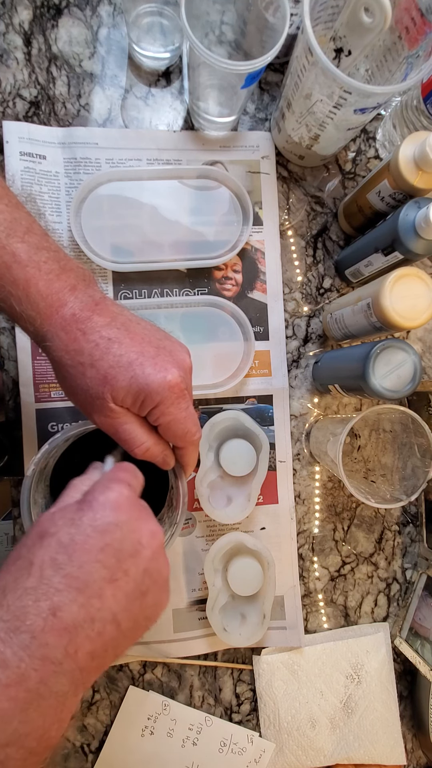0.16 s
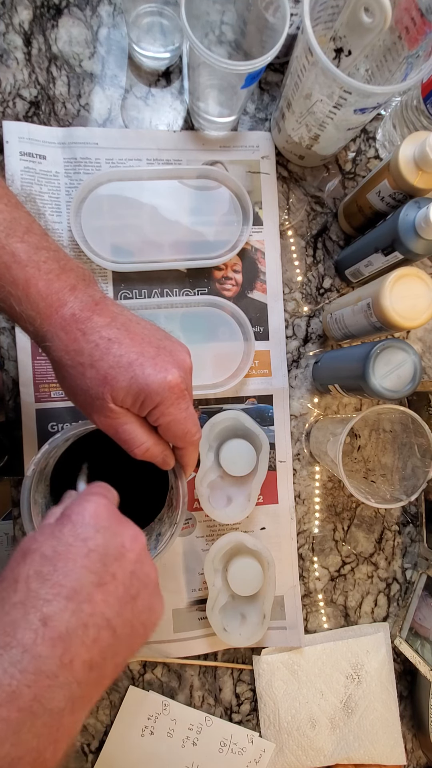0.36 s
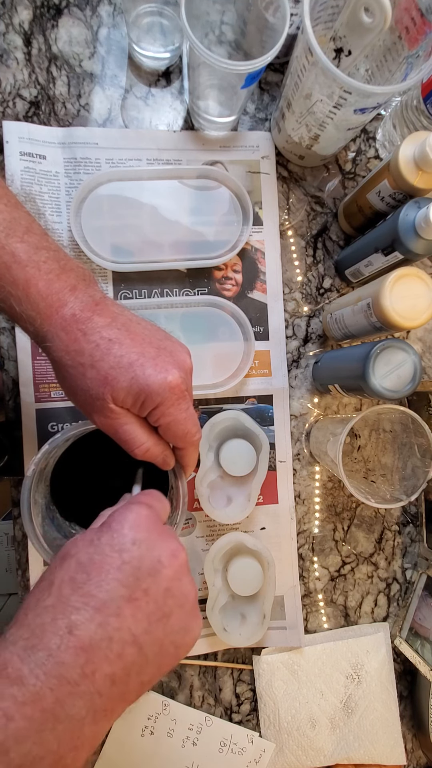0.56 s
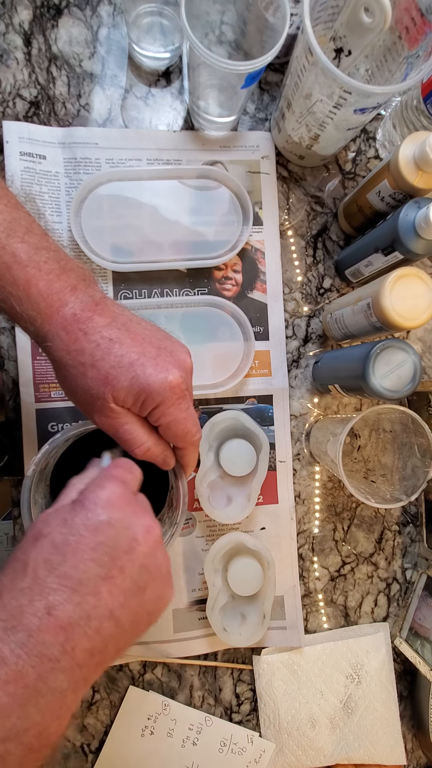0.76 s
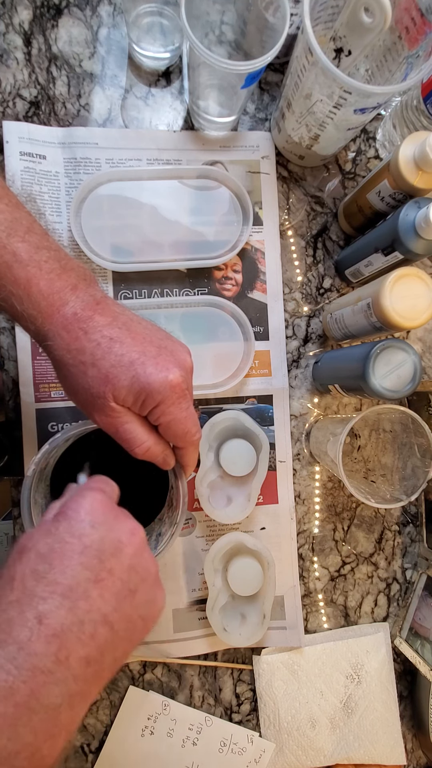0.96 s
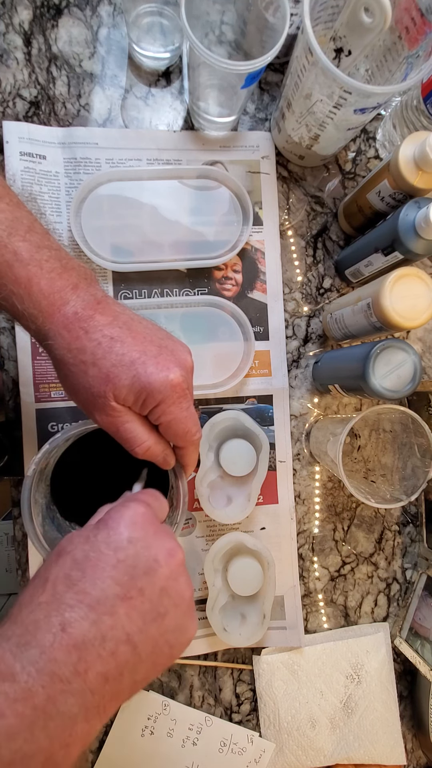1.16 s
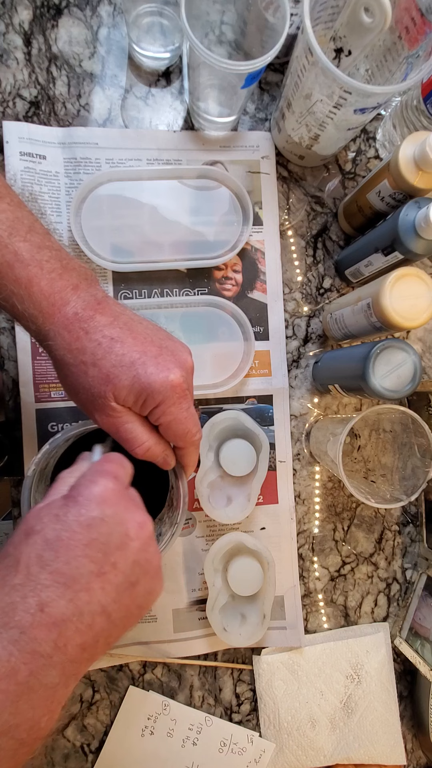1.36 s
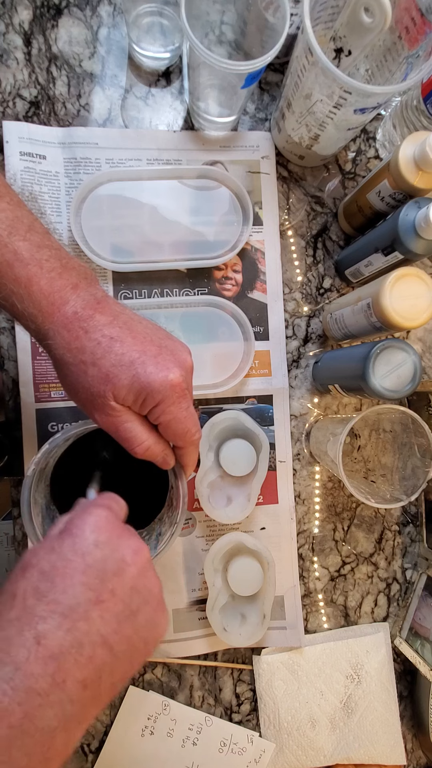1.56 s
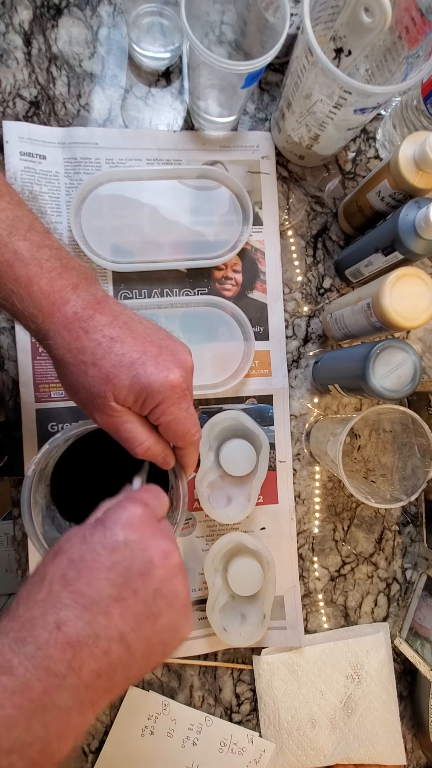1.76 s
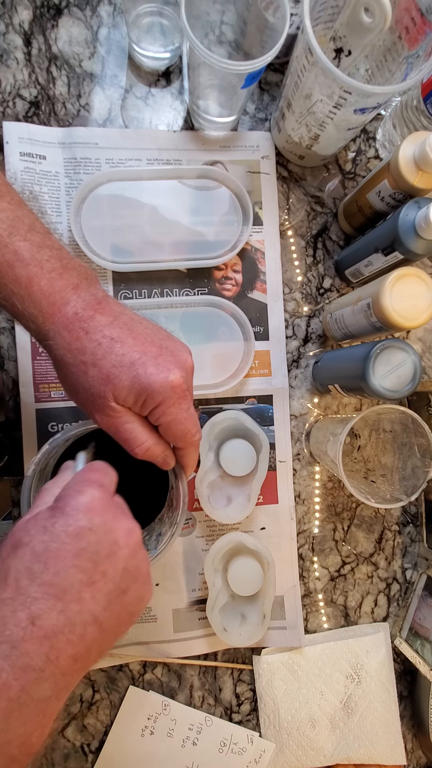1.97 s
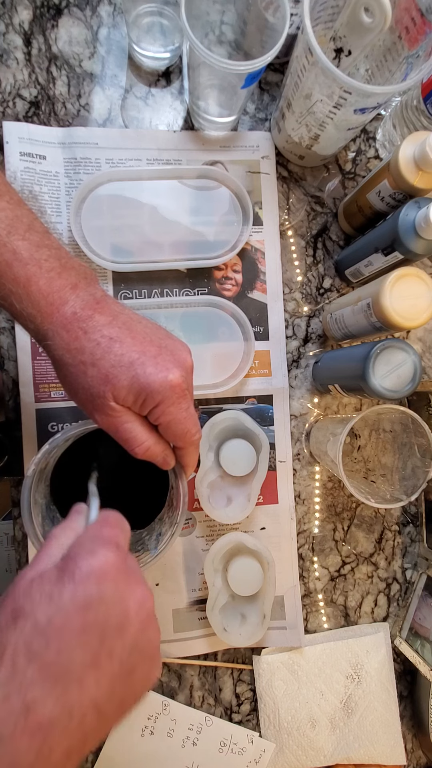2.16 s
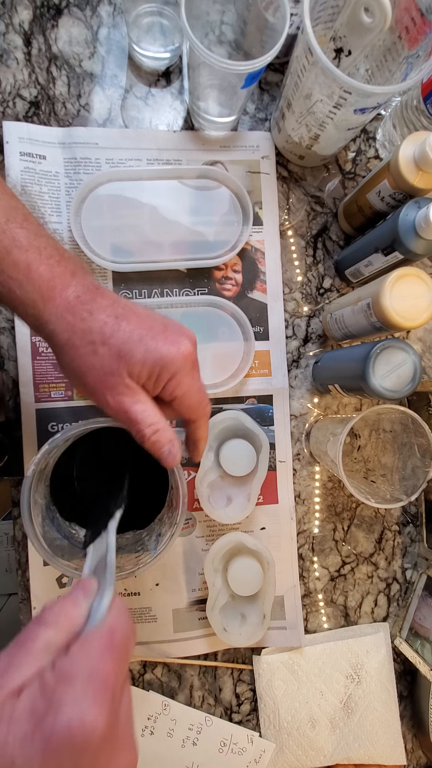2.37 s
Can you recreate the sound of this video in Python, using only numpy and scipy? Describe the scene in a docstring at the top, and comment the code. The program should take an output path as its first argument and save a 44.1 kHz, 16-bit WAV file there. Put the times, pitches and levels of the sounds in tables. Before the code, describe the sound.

A stick scrapes round a plastic cup of wet, gritty cement in quick strokes.

```python
"""A stick stirs gritty wet cement in a plastic cup on a bench, close up in a small, quiet workshop.
The scraping eases in and settles at about three strokes a second: sand grains caught under the stick
shake the cup wall, which booms and rings over the low slosh of the mix. At the turns the stick ticks
on the wall. After a little over two seconds the stirring stops, leaving one soft tick and faint air."""
import sys
import numpy as np
from scipy import signal
from scipy.fft import rfft, irfft, next_fast_len
from scipy.io import wavfile
from scipy.ndimage import uniform_filter1d, map_coordinates

SR = 44100
rng = np.random.default_rng(int(sys.argv[2]) if len(sys.argv) > 2 else 0)


def pcm_store(signal):
    """Save signal as 16-bit PCM."""
    levels = np.round(np.clip(np.atleast_2d(signal), -1, 1) * 32767)
    wavfile.write(sys.argv[1], SR, levels.astype(np.int16).T)


N = 110250

# The plastic wall's resonances. Each row: pitch in Hz, width in Hz, relative level in dB.
WALL_MODES = [(228.4, 102, -9), (361, 60, -7), (1035, 213, -8), (1528.6, 107, 2.5), (1747, 153, -2),
              (1900, 130, -2.5), (2260, 155, -5), (2758, 186, -5.5), (3260, 387, -9.5), (3935, 720, -12),
              (4920, 930, -15.5), (6390, 620, -16)]


def scrape():
    """Grit under the stick drives wall ring, boom and sandy hiss; the heavy mix follows sluggishly."""
    # The stick's pressure. Each row: time in seconds, level in dB, boom and hiss sends in dB.
    strokes = [(0.07, -65, -10, -8.5), (0.09, -59.5, 3.5, -11), (0.2, -46, 2.5, -10.5),
               (0.28, -36, -7.5, -10), (0.305, -36, 5.5, -19), (0.33, -37.5, -11, -8.5),
               (0.42, -41.5, 0.5, -20.5), (0.455, -51, 3.5, -5), (0.48, -55, -11, -4),
               (0.564, -38, 6, -13.5), (0.573, -35, 0, -17.5), (0.66, -40.5, 1.5, -18.5),
               (0.69, -62.5, 6, -1), (0.79, -54, 1, -12), (0.83, -48, 1, -10), (0.88, -35.5, 0, -14.5),
               (0.99, -39, 1.5, -10), (1.015, -47, -6, -10), (1.04, -40, -3.5, -22),
               (1.065, -41.5, 1.5, -4), (1.085, -50.5, 6, -10), (1.13, -36.5, -3, -17.5),
               (1.25, -37.5, -8.5, -10.5), (1.285, -42.5, -5.5, -6.5), (1.315, -88, -8, -9),
               (1.37, -49.5, 1.5, -15), (1.42, -34, -3, -16), (1.5, -32.5, -1, -11.5),
               (1.57, -44, 0.5, -12.5), (1.6, -34.5, -3, -16.5), (1.625, -40, -18, 1),
               (1.645, -50, 4.5, -8), (1.68, -36, -4, -14.5), (1.745, -34.5, 1.5, -12),
               (1.84, -39.5, -5, -12), (1.865, -44.5, -2, -15), (1.915, -49, 4.5, -27),
               (1.95, -42, 2, -10.5), (2.04, -29.5, 3.5, -19.5), (2.07, -34, -3, -11),
               (2.145, -49.5, 0, -13.5), (2.2, -41, 0, -2.5), (2.235, -46.5, 1.5, -6),
               (2.27, -69, -0.5, -22)]
    # The cup's weaker hollow modes. Each row: pitch in Hz, width in Hz, relative level in dB.
    boom_modes = [(467, 81, -5), (588.7, 14.1, 0.5), (693, 43, -8.5), (846, 37, -7.5)]
    # Tone of the sand and of the moving mix. Each row: frequency in Hz, relative level in dB.
    sand_tone = [(4000, -4), (7000, 6), (8200, -1.5), (10000, -1), (15800, -2.5)]
    slosh_tone = [(40, -12.5), (200, -9), (400, -57)]
    level_db, boom_db, hiss_db = curves(strokes)
    t = np.arange(N) / SR
    start_s, stop_s = strokes[0][0], strokes[-1][0] + 0.083
    gate = (t > start_s) * np.clip((stop_s - t) / 0.02, 0, 1)
    force = grit() * amp(level_db) * gate
    wall = ringing(force, WALL_MODES, swell_db=4)
    boom_force = force * amp(boom_db)
    boom = hollow(boom_force) + ringing(boom_force * amp(-7), boom_modes, swell_db=3)
    sand = shaken(force * amp(hiss_db), colour(sand_tone))
    sluggish_db = uniform_filter1d(level_db, size=round(0.25 * SR))  # the cement's inertia
    slosh = shaken(amp(sluggish_db - 18), colour(slosh_tone))
    return wall + boom + sand + slosh


def grit(grains_per_s=600, grain_s=0.0019, spread_db=5, rub_share=0.65, chatter_db=1):
    """Each caught grain is a short push of random size, over a smooth rub that chatters."""
    hits = (rng.random(N) < grains_per_s / SR) * amp(spread_db * rng.standard_normal(N))
    bursts = signal.lfilter([1], [1, -np.exp(-1 / (grain_s * SR))], hits)
    force = rub_share + (1 - rub_share) * unit(bursts)
    return unit(force * amp(chatter_db * wobble(60)))


def ticks(snap_t60_s=0.044, ring_t60_s=0.038):
    """The stick meets the wall: a bright snap, a knock, a hollow thud and a short ring."""
    # Sharp ticks to short skids. Each row: start in seconds, level in dB, rise in seconds,
    # ring pitch in Hz, ring level over the tick in dB.
    contacts = [(0.0844, -46.5, 0.001, 2310, -10), (0.1337, -46, 0.003, 2280, 4.5),
                (0.181, -42.5, 0.0017, 1960, -4), (0.435, -39.5, 0.0095, 1496, -4),
                (0.499, -36.5, 0.0015, 1620, -9), (0.606, -46.5, 0.0024, 1528, 19),
                (0.646, -52.5, 0.0064, 1034, 18.5), (0.733, -45.5, 0.0094, 2207, 4.5),
                (0.827, -45.5, 0.0014, 1880, 11.5), (1.029, -58.5, 0.014, 1545, 21),
                (1.051, -32.5, 0.004, 1500, -11), (1.332, -32.5, 0.0017, 1790, -21),
                (1.4165, -40.5, 0.005, 1560, 10), (1.587, -45.5, 0.0052, 1494, 15),
                (1.658, -47.5, 0.0027, 1185, 11), (1.734, -39.5, 0.0038, 1672, 11.5),
                (1.882, -39.5, 0.011, 2247, -3), (1.928, -46.5, 0.0016, 1560, 9.5),
                (2.148, -42, 0.0025, 2640, -11), (2.381, -61, 0.0025, 1197, -8)]
    # Tone of the snap. Each row: frequency in Hz, relative level in dB.
    snap_tone = [(710, -14), (1200, -7.5), (2940, -4), (6250, -5.5), (8100, -16), (15800, -19.5)]
    t = np.arange(SR // 10) / SR
    force, ring = np.zeros((2, N + SR))
    for start_s, db, rise_s, hz, ring_db in contacts:
        at = slice(round(start_s * SR), round(start_s * SR) + len(t))
        attack = 1 - np.exp(-(2 * t / rise_s) ** 2)
        decay_s = np.maximum(t - rise_s, 0)
        force[at] += amp(db - 60 * decay_s / snap_t60_s) * attack
        ring[at] += amp(db + ring_db - 60 * decay_s / ring_t60_s) * attack * np.sin(2 * np.pi * hz * t)
    force, ring = force[:N], ring[:N]
    snap = shaken(force, colour(snap_tone))
    knock = amp(-7) * shaken(force, modes(WALL_MODES))
    thud = amp(-1.5) * hollow(force)
    return snap + knock + thud + ring * [[1], [.5]]


def hollow(force, width_hz=80.4):
    """The cup's main hollow note, gliding as hand and stick move over its mouth."""
    # The glide. Each row: time in seconds, pitch in Hz.
    glide = [(0.3, 560), (0.42, 528), (0.6, 559.1), (0.95, 528), (1.14, 561), (1.45, 528.9), (1.78, 567.8),
             (2.05, 525)]
    hz, = curves(glide)
    pole = np.exp(-np.pi * width_hz / SR)
    push = force * (rng.standard_normal((2, N)) + 1j * rng.standard_normal((2, N)))
    double_pole = np.convolve([1, -pole], [1, -pole])  # for steep skirts
    swing = signal.lfilter([2 * (1 - pole) ** 1.534], double_pole, push)
    return (swing * np.exp(2j * np.pi * np.cumsum(hz) / SR)).real


def ringing(force, table, swell_db, narrow_hz=245, shifts_per_s=40):
    """The cup's modes ring; narrow ones swell and sink most as the contact point travels."""
    power = np.array([width * amp(2 * db) for _, width, db in table])
    share = np.sqrt(power / power.sum())
    push = force * rng.standard_normal((2, N))
    sound = np.zeros((2, N))
    for k, (hz, width, db) in enumerate(table):
        swell = unit(amp(swell_db * min(1, narrow_hz / width) * wobble(shifts_per_s)))
        sound += (-1) ** k * share[k] * filtered(push * swell, modes([(hz, width, db)]))
    return sound


def room(x):
    """The workshop's short reverb, in which the treble lasts longest."""
    # Each row: frequency in Hz, seconds to fall by 60 dB.
    decay_times = [(500, 0.13), (10000, 0.22)]
    hz, t, noise = signal.stft(rng.standard_normal((2, SR // 2)), SR, nperseg=256)
    decay = amp(-60 * t / along(decay_times, hz)[:, None])
    tail = signal.istft(noise * decay, SR, nperseg=256)[1]
    delayed = np.pad(x, ((0, 0), (300, 0)))
    return signal.fftconvolve(delayed, tail / np.linalg.norm(tail[0]), axes=1)[:, :N]


def air():
    """Room tone: a murmur that sinks at the end, and a hiss that fades and faintly returns."""
    # Tone of murmur and hiss. Each row: frequency in Hz, relative level in dB.
    murmur_tone = [(30, 14), (70, -4), (484, -2.5), (932, -15), (1260, -4.5), (2060, -13), (8000, -21.5),
                   (10400, -47)]
    hiss_tone = [(3000, -14), (6900, -7), (15800, -13.5)]
    # Each row: time in seconds, murmur lift in dB, hiss level in dB.
    fades = [(0, 9.5, -59), (2.2, 12, -98), (2.3, 10, -75), (2.5, 1.5, -78)]
    # The murmur's width. Each row: frequency in Hz, left-right likeness (1 is mono).
    likeness = [(100, 0.98), (1000, 0.068), (6000, 0.028)]
    lift_db, hiss_db = curves(fades)
    murmur_gain = amp(-68.5 + lift_db + 1.1 * wobble(11.86))
    murmur = murmur_gain * stereo(shaken(np.ones(N), colour(murmur_tone)), likeness)
    return murmur + shaken(amp(hiss_db), colour(hiss_tone))


def amp(db):
    """dB to gain."""
    return 10 ** (np.asarray(db) / 20)


def unit(x):
    """Scaled to rms 1."""
    return x / np.sqrt(np.mean(x ** 2) + 1e-20)


def along(points, hz):
    """(Hz, value) points joined on a log axis."""
    f, v = np.transpose(points)
    return np.interp(np.log(hz + 1), np.log(f + 1), v)


def curves(rows):
    """One value per sample for each column after the time."""
    times, *columns = np.transpose(rows)
    return [np.interp(np.arange(N) / SR, times, column) for column in columns]


def wobble(rate):
    """A smooth random curve, rate knots a second."""
    return map_coordinates(rng.standard_normal(N // 200), [np.arange(N) * min(rate, 200) / SR])


def filtered(x, response):
    """x through a frequency response scaled to a mean power gain of 1."""
    size = next_fast_len(N + SR // 2)
    gain = response(np.fft.rfftfreq(size, 1 / SR))
    return irfft(rfft(x, size) * gain / np.sqrt(np.mean(abs(gain) ** 2)), size)[..., :N]


def modes(table):
    """The response of resonances summed with alternating signs."""
    return lambda f: sum((-1) ** k * amp(db) * 1j * f * width / (hz * hz - f * f + 1j * f * width)
                         for k, (hz, width, db) in enumerate(table))


def colour(points):
    """A smooth response through (Hz, dB) points."""
    return lambda hz: amp(along(points, hz))


def shaken(force, response):
    """Noise pushed by a force envelope through a response."""
    return filtered(force * rng.standard_normal((2, N)), response)


def stereo(pair, likeness):
    """Two unrelated signals mixed into a left and right of the given likeness."""
    def mix(hz):
        turn = np.arccos(np.clip(along(likeness, hz), -1, 1)) / 2
        return np.array([np.cos(turn), np.sin(turn)])
    mid, side = filtered(pair, mix)
    return np.array([mid + side, mid - side])


def scene():
    """The cup, its reverb and the room tone."""
    # Narrow boom, wide sand. Each row: frequency in Hz, left-right likeness (1 is mono).
    likeness = [(500, 0.89), (1100, 0.57), (2500, 0.59), (6000, 0.03), (15000, 0.066)]
    cup = stereo(scrape() + ticks(), likeness)
    return cup + amp(-13.5) * room(cup) + air()


def record(dry):
    """The sound leans left; the deepest bass and the highest treble are cut."""
    # Each row: frequency in Hz, left over right in dB.
    balance = [(100, 2), (300, 1), (550, 6), (1000, 0.5), (4000, 3), (9000, 0.5), (14000, 5.5)]
    low_cut_hz, top_hz = 45.2, 15850

    def pan_and_low_cut(hz):
        pan = amp(along(balance, hz) / 2 * np.array([[1], [-1]]))
        return pan / np.sqrt(1 + (low_cut_hz / (hz + 1)) ** 16)
    leaning = filtered(dry, pan_and_low_cut)
    size = next_fast_len(N + SR // 2)
    passband = np.fft.rfftfreq(size, 1 / SR) < top_hz
    return irfft(rfft(leaning, size) * passband, size)[:, :N]


dry = scene()
out = record(dry)
pcm_store(out)
```